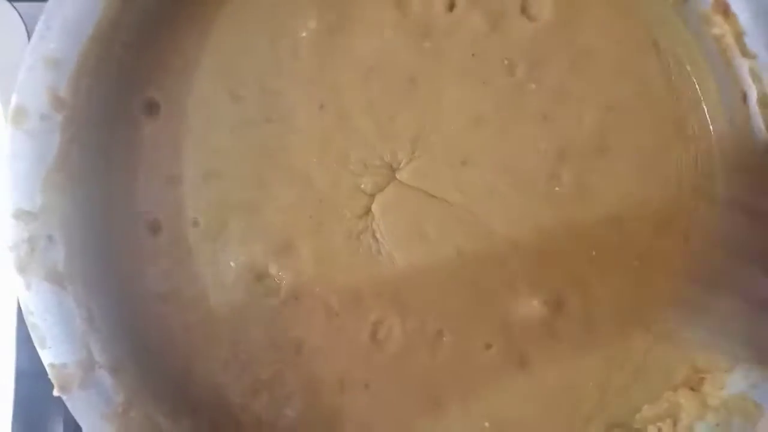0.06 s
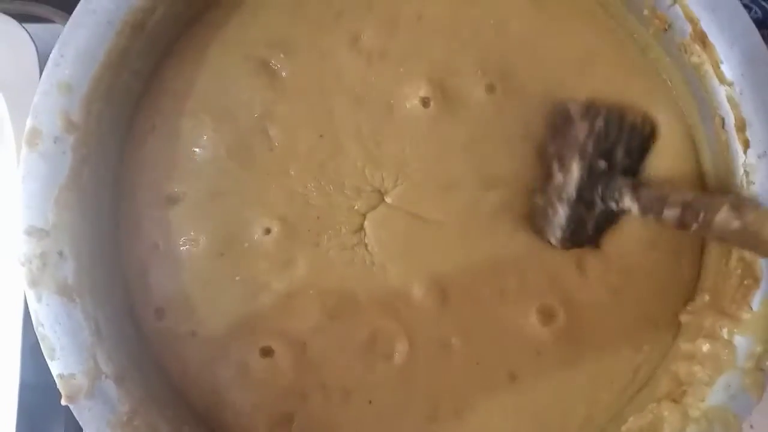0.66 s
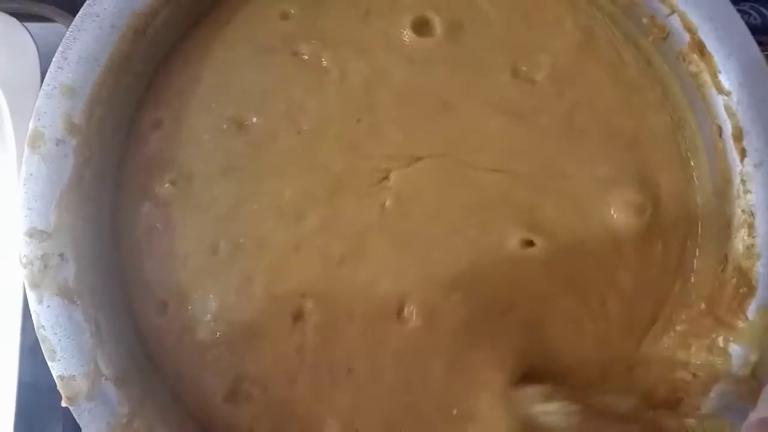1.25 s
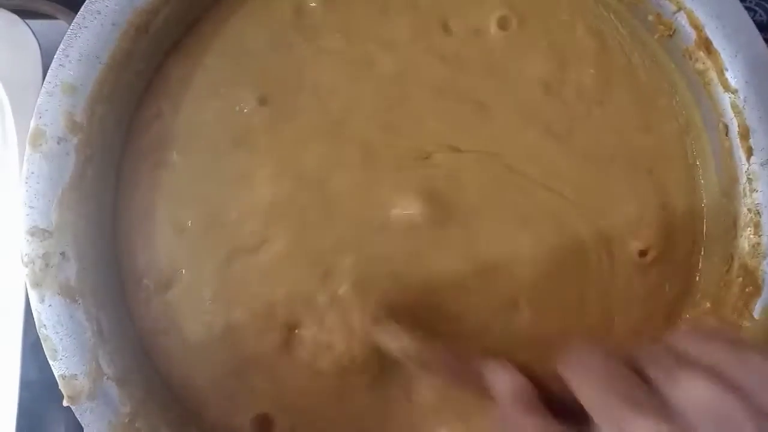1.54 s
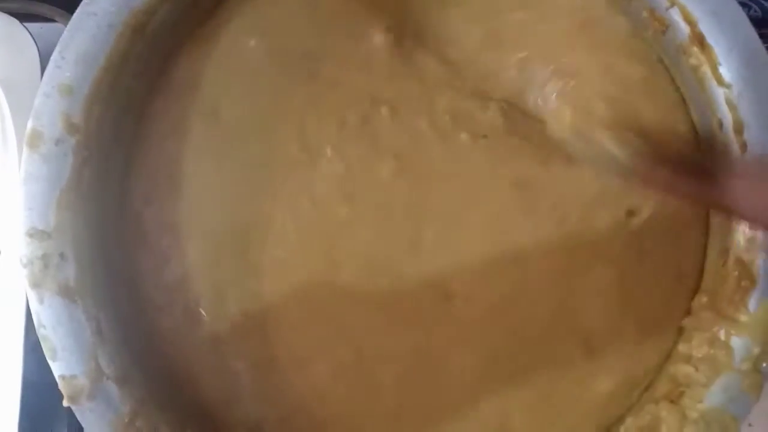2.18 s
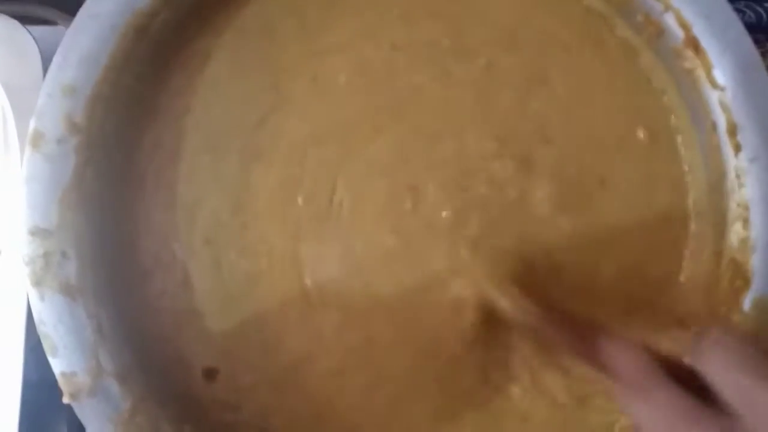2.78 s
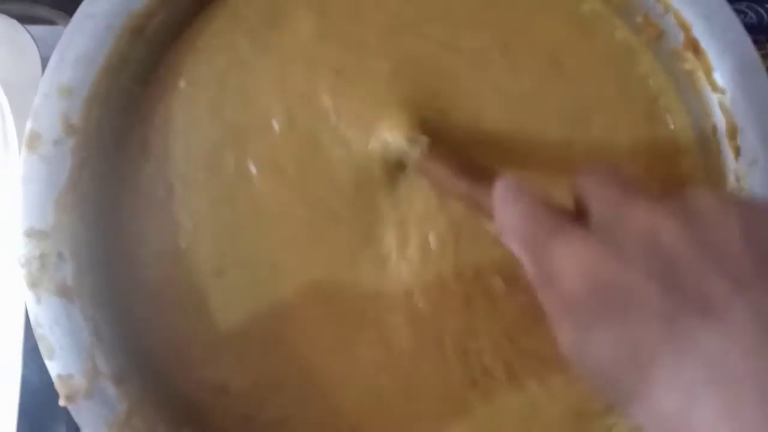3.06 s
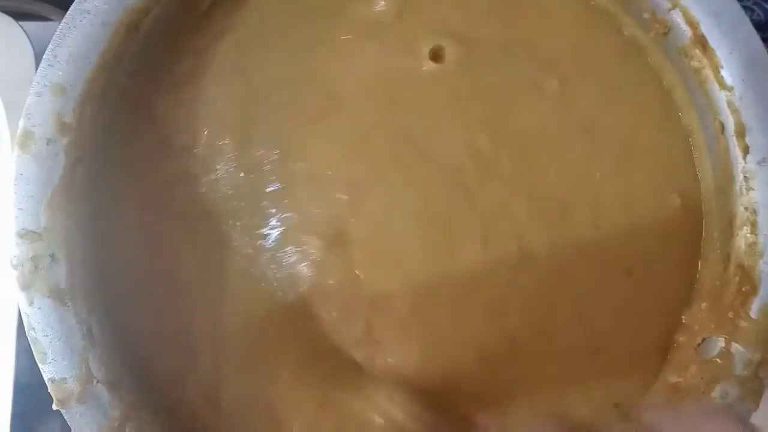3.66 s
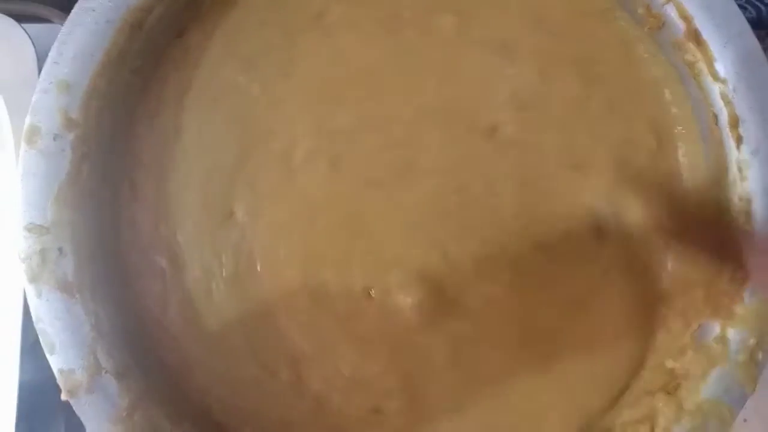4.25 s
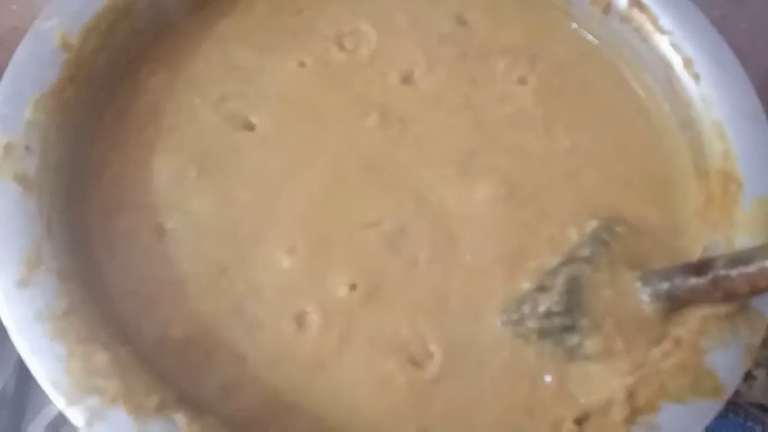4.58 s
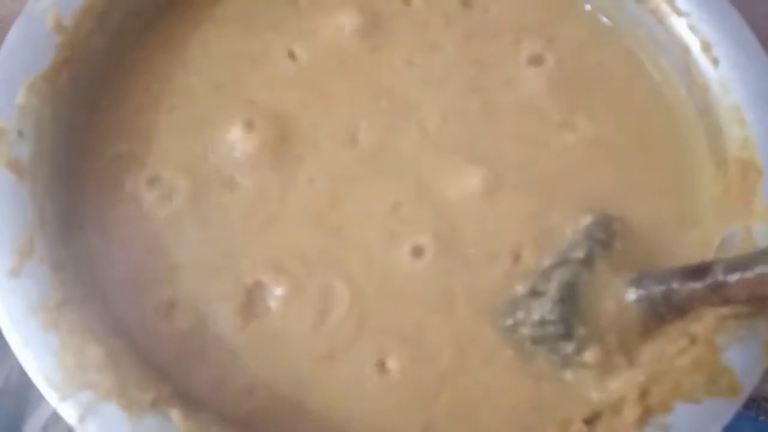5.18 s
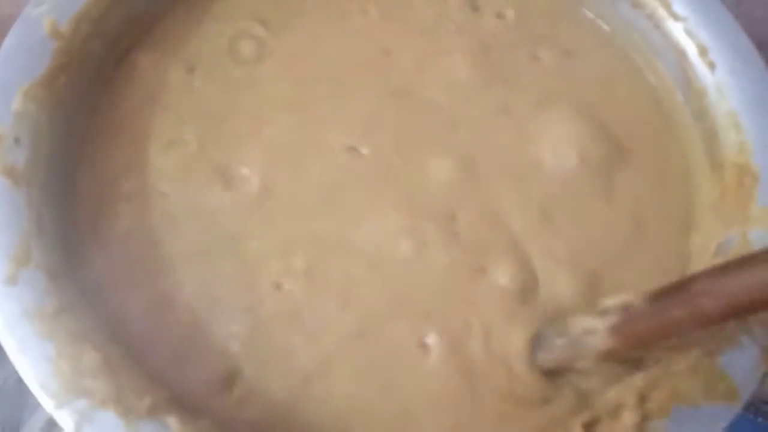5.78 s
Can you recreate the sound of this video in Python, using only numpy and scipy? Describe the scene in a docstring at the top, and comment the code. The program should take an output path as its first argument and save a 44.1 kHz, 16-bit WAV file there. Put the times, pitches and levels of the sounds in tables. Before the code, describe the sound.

A thick stew simmers in a metal pot in a small kitchen, heard close and louder on the left. Throughout, a steady sizzle lies over a fluttering low gas flame rumble, with soft wet blips, small bubble pops and occasional sharp spits, all slightly hollow from the pot. Thin, breathy steam whistles slide in pitch until about 4.4 seconds. A wooden paddle scrapes wetly at the start, at 0.7 and at 1.7 seconds, with dull knocks around 1.1, 1.8 and 2.6. The strongest scrape and bump come at 3.1. Near 3.8 the paddle catches on the metal with three quick dry cracks, then grates and judders until 4.4, when the finest fizz stops. At 5 seconds the sound drops out for an instant. At 5.6 one big bubble bursts with the loudest plop, followed by a soft scrape and two dull knocks.

```python
"""In a small kitchen, a thick stew simmers in a metal pot on a gas burner while a wooden paddle stirs it.
The flame rumbles, stew sizzles on the hot metal, steam whistles through gaps and small bubbles pop.
The paddle scrapes, bumps and catches on the pot, and the air in the pot rings along.
Near the end the sound drops out briefly; then one big bubble bursts with the loudest plop."""
import sys
import numpy as np
from scipy import signal
from scipy.fft import rfft, irfft, next_fast_len
from scipy.io import wavfile
from scipy.ndimage import map_coordinates

SR = 44100
rng = np.random.default_rng(int(sys.argv[2]) if len(sys.argv) > 2 else 0)


def unload_audio(sound):
    """Save the sound as a 16-bit wav file, at the path given as the first command line argument."""
    columns = np.transpose(np.atleast_2d(sound))
    # keep every value between -1 and 1, then stretch to whole-number steps
    steps = np.round(np.clip(columns, -1, 1) * 32767)
    wavfile.write(sys.argv[1], SR, steps.astype(np.int16))


N = 256386
TIME = np.arange(N) / SR


def amp(db):
    """Turn decibels into a gain to multiply by."""
    return 10 ** (np.asarray(db) / 20)


def unit(x):
    """Scale a sound to an average (rms) level of 1."""
    return x / np.sqrt(np.mean(x ** 2) + 1e-20)


def along(points, hz):
    """Read between a table's (pitch, value) rows, on a log pitch scale."""
    pitches, values = np.transpose(points)
    return np.interp(np.log(hz + 1), np.log(pitches + 1), values)


def wobble(per_s):
    """A smooth curve through per_s random values a second."""
    return map_coordinates(rng.standard_normal(2048), [TIME * per_s], mode="wrap")


def filtered(x, response):
    """Turn each frequency up or down by the gain response(hz)."""
    size = next_fast_len(N + 8192)
    return irfft(rfft(x, size) * response(np.fft.rfftfreq(size, 1 / SR)), size)[..., :N]


def coloured(x, spectrum):
    """Shape a sound's tone with a table, then scale it to level 1."""
    return unit(filtered(x, lambda hz: amp(along(spectrum, hz))))


def cut_lows(x, hz):
    """Weaken everything below hz."""
    return signal.sosfilt(signal.butter(2, hz, "highpass", fs=SR, output="sos"), x)


def add(track, start_s, sound):
    """Mix a sound into a track."""
    start = max(round(start_s * SR), 0)
    part = track[..., start:start + sound.shape[-1]]
    part += sound[..., :part.shape[-1]]


def stereo(x, lag_s=0.00062):
    """Direct sound reaches the right side just before the left."""
    return np.array([np.roll(x, round(lag_s * SR)), x])


def spread(direct, share):
    """Blend a share of direct sound with noise that stands for its reflections."""
    return np.sqrt(share) * stereo(unit(direct)) + np.sqrt(1 - share) * rng.standard_normal((2, N))


def crackle(per_s, scatter_db):
    """Tiny clicks of random size at random moments."""
    size = amp(scatter_db * np.clip(rng.standard_normal(N), -2, 2))
    return size * np.sign(rng.standard_normal(N)) * (rng.random(N) < per_s / SR)


def pitched_noise(hz, width_hz, count):
    """Noise gathered around one pitch, which may slide."""
    pole = np.exp(-2 * np.pi * width_hz / SR)
    noise = rng.standard_normal((2, count)) + 1j * rng.standard_normal((2, count))
    slow_noise = signal.lfilter([1], [1, -2 * pole, pole ** 2], noise)
    phase = 2 * np.pi * np.cumsum(hz * np.ones(count)) / SR
    return unit(np.real(slow_noise * np.exp(1j * phase)))


def ring(hz, fade_s, attack_s, bend):
    """A tone that drops 60 dB in fade_s while its pitch shifts by the fraction bend."""
    t = np.arange(SR // 6) / SR
    pitch = hz * (1 + bend * (1 - np.exp(-2 * t / fade_s)))
    envelope = amp(-60 * t / fade_s) * (1 - np.exp(-t / attack_s)) ** 2
    tone = envelope * np.sin(2 * np.pi * np.cumsum(pitch) / SR)
    return tone / np.abs(tone).max()


# how long the kitchen echoes: pitch_hz, fade_s
KITCHEN_ECHO = [(150, 0.33), (1500, 0.3), (10000, 0.085)]
def in_kitchen(sound, echo_db, gap_s=0.006):
    """The pot and the walls give a short sound an echo whose highs die first."""
    hz, t, noise = signal.stft(rng.standard_normal((2, SR // 3)), SR, nperseg=256)
    fade = amp(-60 * t / along(KITCHEN_ECHO, hz)[:, None])
    tail = signal.istft(noise * fade, SR, nperseg=256)[1]
    tail /= np.linalg.norm(tail[0])
    out = np.zeros((2, SR))
    add(out, 0, stereo(sound))
    add(out, gap_s, amp(echo_db) * signal.fftconvolve(sound[None], tail, axes=1))
    return out


# notes of the air above the stew: pitch_hz, width_hz, level_db
POT_NOTES = [(317, 16, 0), (426, 3.6, -4), (717, 30, -6), (913, 192, 4.5), (1210, 24, -4.5),
             (1580, 17, -17), (1800, 9.1, -22), (2474, 18, -29), (2842, 56, -3), (3250, 16, -12),
             (4700, 10, -18.5), (6120, 34, -8.5), (7520, 150, -4), (8300, 30, -11.5)]
def in_pot(x, echo_db=-22):
    """The air in the pot rings along, and the steep wall throws back quick echoes."""
    def ringing(f):
        return 1 + sum(amp(db) * 1j * f * width / (hz * hz - f * f + 1j * f * width)
                       for hz, width, db in POT_NOTES)
    echoes = np.zeros((2, SR // 50))
    for side in echoes:
        side[rng.integers(SR // 500, len(side), size=12)] = amp(echo_db) * rng.choice([-1, 1], size=12)
    echoes[:, 0] = 1  # the direct sound
    return signal.fftconvolve(filtered(x, ringing), echoes, axes=1)[:, :N]


def before_cut(cut_s=4.41, fade_s=0.027):
    """1 until a cut at about 4.4 s, 0 after it: the high fizz and steady grumble stop abruptly."""
    return np.clip(1 - (TIME - cut_s) / fade_s, 0, 1)


# tone of the flame: pitch_hz, level_db
FLAME_TONE = [(15, -60.5), (25, -29), (38, -25.5), (65, -39), (83, -9.5), (108, 4.5), (171, -7.5),
              (205, -3), (233, -26.5), (264, -15), (390, -31), (592, -26.5), (700, -37), (910, -59),
              (1540, -120)]
# the burner's booming notes: pitch_hz, width_hz, level_db
BURNER_NOTES = [(112.5, 17.2, -47), (260, 30, -61)]
def flame(roar_db=-41):
    """The gas flame flutters and rumbles, booming under the pot."""
    roar = amp(roar_db) * coloured(spread(rng.standard_normal(N), share=0.74), FLAME_TONE)
    boom = sum(amp(db) * stereo(pitched_noise(hz, width, N)[0]) for hz, width, db in BURNER_NOTES)
    return (roar + boom) * amp(1.6 * wobble(per_s=14))


def seethe(level_db=-57, clump_db=4):
    """Soft wet blips come in clumps under the skin of the stew."""
    # pitch_hz, level_db
    tone = [(300, -26), (550, -4.5), (830, -5.5), (1150, 0.5), (1700, -9.5), (4000, -35)]
    blips = coloured(spread(crackle(per_s=430, scatter_db=4), share=0.38), tone)
    return amp(level_db) * unit(blips * amp(clump_db * wobble(per_s=7.3)))


# tones of the hiss and of the finest fizz: pitch_hz, level_db
HISS_TONE = [(200, -37), (450, -14.5), (600, -20.5), (750, -17), (950, -23), (1400, -8), (2050, -2.5),
             (2900, -0.5), (4000, -3.5), (5400, -6.5), (6700, -3), (7900, -4.5), (9400, -9.5), (13400, -14),
             (15300, -12)]
FIZZ_TONE = [(5000, -31.5), (9000, -1), (11000, 3), (13400, -2), (14400, 6), (15000, 8), (16000, 0)]
def sizzle(hiss_db=-38, after_cut_rise_db=0.45, fizz_db=-44.5, tick_db=-51):
    """Stew on hot metal makes countless tiny steam bursts; a few stand out as ticks."""
    hiss = coloured(spread(crackle(per_s=4000, scatter_db=4), share=0.15), HISS_TONE)
    hiss *= amp(hiss_db + after_cut_rise_db * (1 - before_cut()))
    fizz = coloured(spread(crackle(per_s=2000, scatter_db=7), share=0.16), FIZZ_TONE)
    fizz *= amp(fizz_db) * before_cut()
    ticks = amp(tick_db) * stereo(coloured(crackle(per_s=25, scatter_db=7.5), HISS_TONE))
    flutter = amp(0.6 * wobble(per_s=14))
    return (hiss + fizz) * flutter + ticks


# steam squeezing through gaps: start_s, length_s, first_hz, last_hz, breath_db, whistle_db
STEAM_GAPS = [(0, 0.085, 2590, 2506, -34, -48), (0, 0.28, 2360, 2374, -46, -44),
              (0.29, 0.35, 2880, 3016, -46, -43.5), (0.973, 0.21, 2910, 2970, -48.5, -44.5),
              (1.58, 0.53, 2850, 2905, -46, -48.5), (1.803, 0.5, 2384, 2537, -48, -44),
              (2.376, 0.32, 2360, 2305, -42.5, -47), (2.598, 0.16, 3160, 3150, -42, -49.5),
              (3.38, 0.31, 2590, 2826, -43.5, -52), (3.967, 0.26, 2580, 2457, -49, -40.5),
              (4.111, 0.08, 2514, 2456, -47, -35), (4.164, 0.22, 2400, 2210, -40.5, -58),
              (4.184, 0.24, 1687, 1184, -37.5, -52)]
def steam_whistles(breath_width_hz=220, whistle_width_hz=35):
    """Each gap in the stew swells into a breathy whistle that slides as the gap changes size."""
    out = np.zeros((2, N))
    for start_s, length_s, first_hz, last_hz, breath_db, whistle_db in STEAM_GAPS:
        progress = np.linspace(0, 1, round(length_s * SR))
        hz = first_hz + (last_hz - first_hz) * progress
        whistle = amp(whistle_db) * pitched_noise(hz, whistle_width_hz, len(hz))
        breath = amp(breath_db) * pitched_noise(hz, breath_width_hz, len(hz))
        swell = np.sqrt(np.abs(np.sin(np.pi * progress)))
        add(out, start_s, swell * (whistle + breath))
    return out


# hot stew spitting: start_s, level_db, pitch_hz, fade_s
STEW_SPITS = [(0.862, -30, 14300, 0.099), (2.442, -27, 6700, 0.081), (3.584, -24, 14500, 0.018),
              (5.228, -28.5, 3800, 0.02)]
def spits():
    """Hot stew spits in short, sharp puffs of noise; the highest are the thinnest."""
    out, t = np.zeros((2, N)), np.arange(SR // 6) / SR
    freqs = np.fft.rfftfreq(len(t), 1 / SR) + 1
    for start_s, db, hz, fade_s in STEW_SPITS:
        width_octaves = 5000 / hz
        band = 1 / (1 + (np.log2(freqs / hz) / width_octaves) ** 2)
        puff = unit(irfft(rfft(rng.standard_normal(len(t))) * band, len(t)))
        add(out, start_s, amp(db) * in_kitchen(puff * amp(-60 * t / fade_s), echo_db=1))
    return out


def pop(hz, rise_octaves=1.8):
    """The air in a bursting bubble rings briefly, rising in pitch as the skin opens."""
    length_s = 0.0062 * rng.uniform(0.8, 1.25)
    progress = np.linspace(0, 1, round(length_s * SR))
    pitch = hz * 2 ** (rise_octaves * (progress - 0.5))
    swell = np.sin(np.pi * np.sqrt(progress)) ** 2
    chirp = swell * np.sin(2 * np.pi * np.cumsum(pitch) / SR)
    return in_kitchen(chirp, echo_db=-6, gap_s=0.004)


# the clearest small bubbles: start_s, level_db, pitch_hz
CLEAR_POPS = [(0.272, -29, 2410), (0.703, -31, 2680), (0.756, -29, 2160), (0.872, -32, 2190),
              (0.892, -32, 2320), (1.249, -31.5, 2380), (1.48, -34.5, 1320), (1.529, -30.5, 2430),
              (4.451, -32, 1680), (4.525, -36, 2550), (4.751, -36.5, 2040), (4.865, -32, 1850),
              (4.897, -29.5, 1970), (5.2231, -27, 1920), (5.331, -29.5, 1740), (5.383, -33.5, 1130)]
def bubbles(faint_count=60, faint_db=-39.5, faint_hz=2100):
    """Small bubbles pop all over the surface: clear ones at set times, faint ones at random."""
    out = np.zeros((2, N))
    for start_s, db, hz in CLEAR_POPS:
        add(out, start_s, amp(db) * pop(hz))
    for when, size, pitch in rng.standard_normal((faint_count, 3)):
        start_s = (when % 1) * N / SR
        add(out, start_s, amp(faint_db + 3.2 * size) * pop(faint_hz * np.exp(0.3 * pitch)))
    return out


# paddle strokes: full_pressure_s, attack_s, hold_s, release_s, scrape_db, smear_db, grumble_db
PADDLE_STROKES = [(0, 0.03, 0.028, 0.088, -34.5, -30.5, -52), (0.723, 0.12, 0.12, 0.12, -44, -40.5, -56),
                  (1.676, 0.052, 0.094, 0.16, -42.5, -41, -52.5),
                  (3.062, 0.066, 0.051, 0.12, -27.5, -32, -41),
                  (3.227, 0.03, 0.022, 0.03, -35.5, -35, -50.5), (3.73, 0.12, 0.45, 0.089, -35, -49, -46),
                  (3.97, 0.066, 0.2, 0.1, -51, -42.5, -44.5), (4.3, 0.08, 0.12, 0.011, -41, -35, -46),
                  (5.747, 0.074, 0.04, 0.1, -43, -47, -46)]
def stroke_gains():
    """Scrape, smear and grumble grow as the paddle presses on the pot and fade as it eases off."""
    power = np.zeros((3, N))
    for full_pressure_s, attack_s, hold_s, release_s, *levels_db in PADDLE_STROKES:
        early = np.maximum(full_pressure_s - TIME, 0)
        late = np.maximum(TIME - full_pressure_s - hold_s, 0)
        pressure = np.exp(-(early / attack_s) ** 2 - (late / release_s) ** 2)
        power += np.outer(amp(levels_db), pressure) ** 2
    return np.sqrt(power)


# tones of the dry scrape and the wet smear: pitch_hz, level_db
SCRAPE_TONE = [(200, -24), (400, -13.5), (650, -13), (1050, -15), (1600, -10), (2100, -17), (3000, -12.5),
               (4900, -2.5), (6500, -1.5), (8200, -2), (9500, -9), (13400, -14), (15200, -12)]
SMEAR_TONE = [(200, -13), (600, 4), (1000, 0.5), (1600, 11), (2700, 11.5), (4000, 10.5), (8000, -15)]
def paddle_scrape():
    """Wood grates over the pot's floor and drags stew with it, gripping unevenly."""
    scrape_gain, smear_gain, _ = stroke_gains()
    wet_grains = crackle(per_s=990, scatter_db=3)
    dry_grains = crackle(per_s=2600, scatter_db=1)
    scrape = scrape_gain * coloured(spread(dry_grains, share=0.06), SCRAPE_TONE)
    smear = smear_gain * coloured(spread(wet_grains, share=0.053), SMEAR_TONE)
    return (scrape + smear) * amp(0.96 * wobble(per_s=70))


# the paddle knocking on the pot: start_s, strength_db, pitch_hz, overtone_db
PADDLE_BUMPS = [(1.075, -16.5, 152, -4), (1.771, -24.5, 260, -13), (2.56, -17.5, 154, -5.5),
                (2.632, -22.5, 110, -24), (3.065, -12, 265.6, -4.5), (3.759, -25, 293, 1.5),
                (3.83, -22, 164, -10), (4.12, -19.5, 193, -33), (4.168, -27.5, 198, -10),
                (5.15, -29.5, 90, -24), (5.718, -28, 173, -4), (5.777, -20.5, 95, -19)]
def paddle_bumps(trim_db=-3.5, bend=-0.05):
    """The knocks are dull because the stew stops the pot's ring at once."""
    out = np.zeros((2, N))
    for start_s, db, hz, overtone_db in PADDLE_BUMPS:
        body = ring(hz, fade_s=0.065, attack_s=0.002, bend=bend)
        overtones = ring(hz * 1.48, fade_s=0.062, attack_s=0.0018, bend=bend)
        overtones += 0.65 * ring(hz * 2.13, fade_s=0.021, attack_s=0.0017, bend=bend)
        knock = body + amp(overtone_db) * overtones
        add(out, start_s, amp(db + trim_db) * in_kitchen(knock, echo_db=-5.5, gap_s=0.025))
    return cut_lows(out, hz=80)


# the paddle catching on the metal: start_s, strength_db
PADDLE_CATCHES = [(3.7517, -14), (3.8178, -7.5), (3.834, -14.5)]
# notes of the pot's wall: pitch_hz, level_db, fade_s
WALL_NOTES = [(970, -8, 0.043), (1196, -10.5, 0.075), (1840, -2.5, 0.039), (1990, -0.5, 0.023),
              (2353, -5, 0.073), (2730, -1.5, 0.025), (3864, -1, 0.046), (4380, -1.5, 0.032),
              (6450, -13.5, 0.054), (6620, -13, 0.06), (7800, -11, 0.088)]
# tone of the paddle's edge slipping: pitch_hz, level_db
CRACK_TONE = [(250, -6.5), (600, 8), (1100, 0.5), (2000, 2.5), (7000, 4), (15000, -5.5)]
def paddle_catches(crack_db=-8, crack_fade_s=0.019, ring_db=-6):
    """The paddle's edge sticks, then slips with a dry crack, and the wall rings briefly."""
    out, t = np.zeros((2, N)), np.arange(SR // 5) / SR
    for start_s, db in PADDLE_CATCHES:
        wall = np.zeros(len(t))
        for hz, level_db, fade_s in WALL_NOTES:
            envelope = amp(level_db + rng.normal(0, 1.9) - 60 * t / fade_s)
            wall += envelope * np.sin(2 * np.pi * (hz * t + rng.random()))
        crack = coloured(rng.standard_normal(N), CRACK_TONE)[:len(t)] * amp(-60 * t / crack_fade_s)
        slip = amp(ring_db) * wall / np.abs(wall).max() + amp(crack_db) * crack
        add(out, start_s, amp(db) * in_kitchen(slip, echo_db=-3.5))
    return out


# tone of the pot's floor under the paddle: pitch_hz, level_db
GRUMBLE_TONE = [(45, -29), (70, -12), (110, 0.5), (180, 1.5), (320, -3.5), (480, -10), (650, -15),
                (1500, -41)]
def paddle_grumble(steady_db=-53, after_bump_db=-26.5, after_catch_db=-22, jolt_fade_s=0.5):
    """The paddle judders along the pot's floor, hardest just after it bumps or catches."""
    judder = coloured(spread(crackle(per_s=150, scatter_db=2), share=0.81), GRUMBLE_TONE)
    jolts = [(s, db + after_bump_db) for s, db, *_ in PADDLE_BUMPS]
    jolts += [(s, db + after_catch_db) for s, db in PADDLE_CATCHES]
    jolt_power = sum((TIME > s) * amp(db - 60 * np.abs(TIME - s) / jolt_fade_s) ** 2 for s, db in jolts)
    *_, stroke_gain = stroke_gains()
    return np.sqrt(before_cut() * amp(steady_db) ** 2 + stroke_gain ** 2 + jolt_power) * judder


# the one big bubble: start_s, level_db, pitch_hz
BIG_BUBBLE = (5.5898, -6.5, 970)
def plop(low_cut_hz=700, crater_hz=1640, crater_db=-15):
    """A big bubble bursts: its hollow holds no deep tones, and the open crater rings on."""
    out = np.zeros((2, N))
    start_s, db, hz = BIG_BUBBLE
    burst = cut_lows(ring(hz, fade_s=0.0047, attack_s=0.00074, bend=0.64), low_cut_hz)
    add(out, start_s, amp(db) * in_kitchen(burst, echo_db=-12, gap_s=0.008))
    crater = ring(crater_hz, fade_s=0.018, attack_s=0.00041, bend=0.042)
    add(out, start_s + 0.003, amp(db + crater_db) * in_kitchen(crater, echo_db=3, gap_s=0.0077))
    return out


def scene():
    """The flame and the bumps are heard directly; the rest rings inside the pot."""
    outside = flame() + paddle_bumps()
    inside = sizzle() + seethe() + paddle_scrape() + paddle_grumble() + paddle_catches()
    inside += steam_whistles() + bubbles() + plop() + spits()
    return outside + in_pot(inside)


# a short silence: start_s, end_s
SILENCE = (4.966, 5.103)
# how much louder the left side is than the shaded right: pitch_hz, difference_db
RIGHT_SHADE = [(110, 3.5), (400, 3.5), (700, 4.5), (1300, 6), (2400, 11.5), (5000, 7), (7000, 14),
               (9500, 4.5), (14000, 8)]
def record(dry, top_hz=16000):
    """The right side is shaded, the sound drops out for a moment, and the highest treble is cut."""
    sound_on = (TIME < SILENCE[0]) | (TIME > SILENCE[1])
    shaded = filtered(dry, lambda hz: amp(np.outer([0.5, -0.5], along(RIGHT_SHADE, hz))))
    return filtered(shaded * sound_on, lambda hz: hz < top_hz)


dry = scene()
out = record(dry)
unload_audio(out)
```